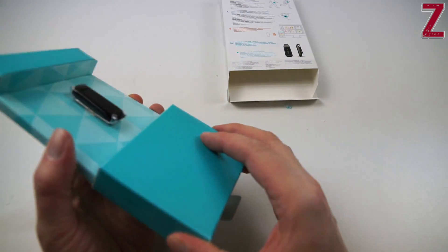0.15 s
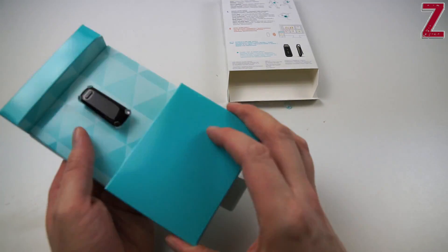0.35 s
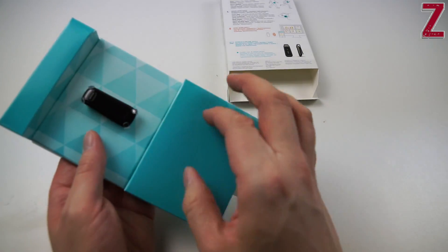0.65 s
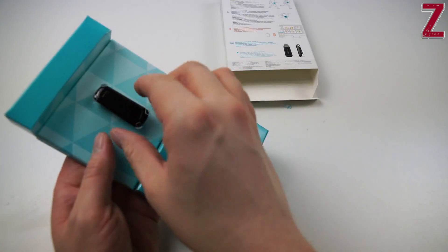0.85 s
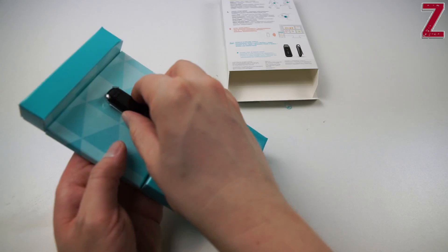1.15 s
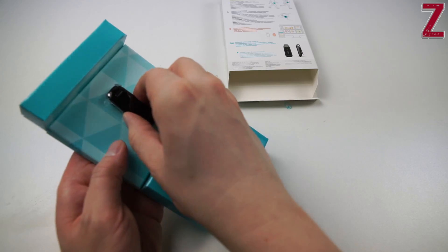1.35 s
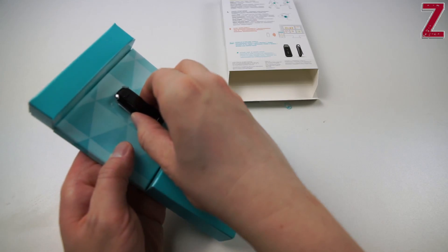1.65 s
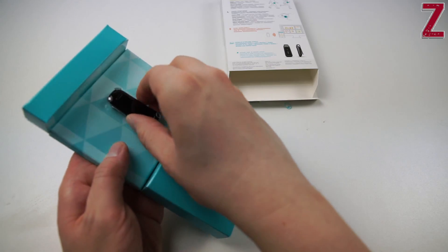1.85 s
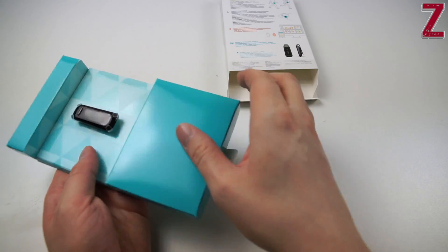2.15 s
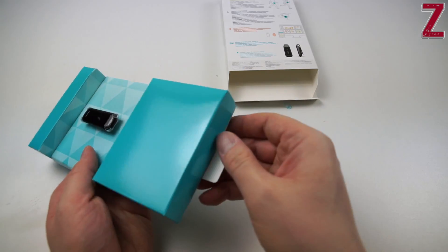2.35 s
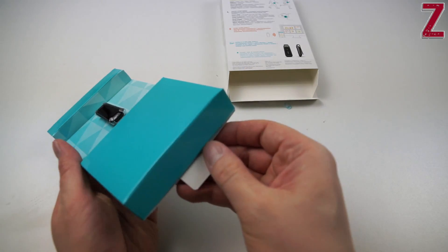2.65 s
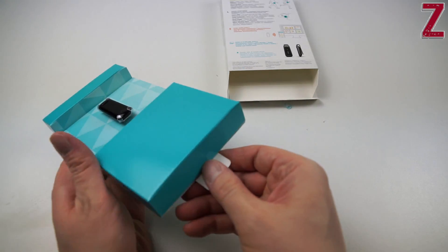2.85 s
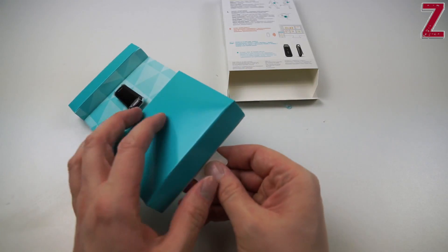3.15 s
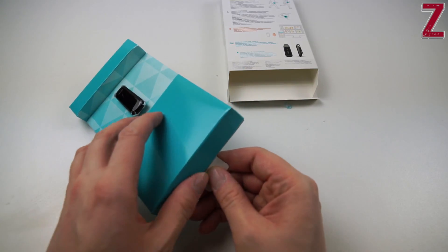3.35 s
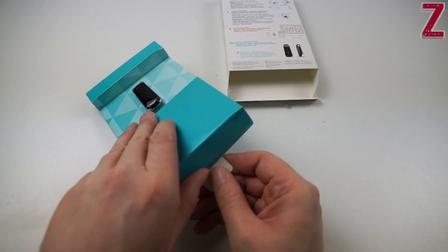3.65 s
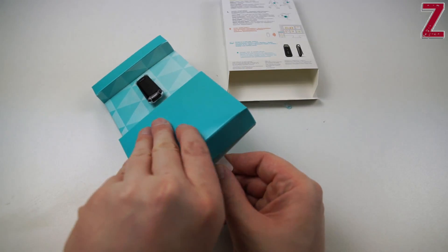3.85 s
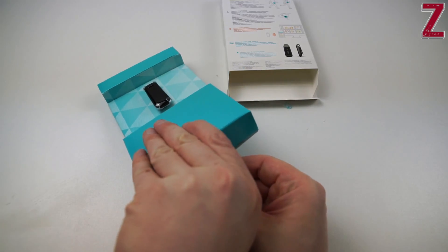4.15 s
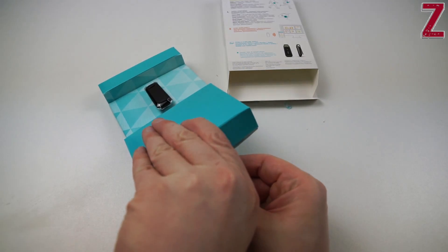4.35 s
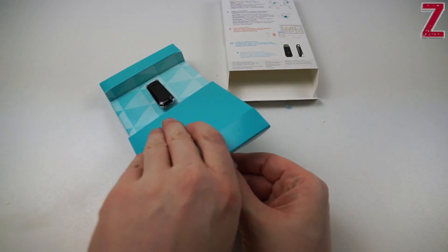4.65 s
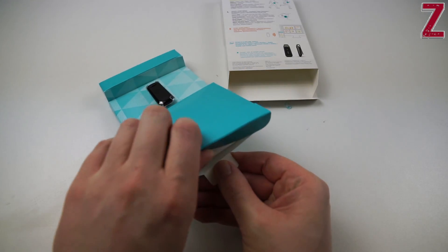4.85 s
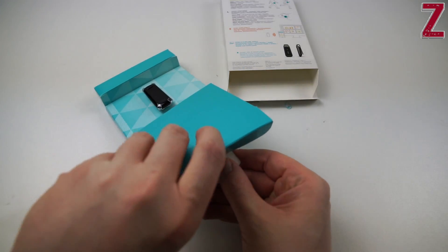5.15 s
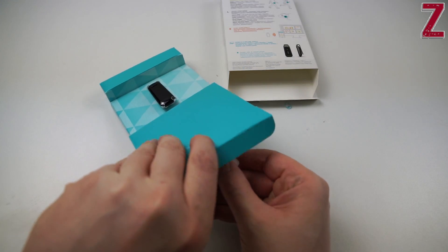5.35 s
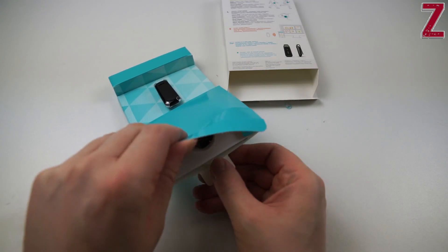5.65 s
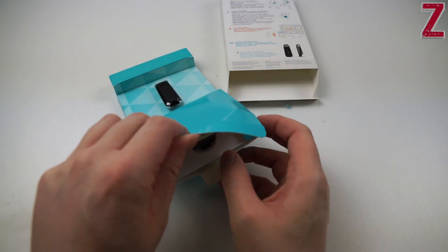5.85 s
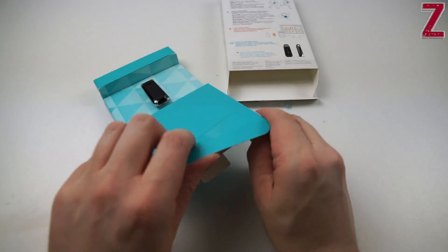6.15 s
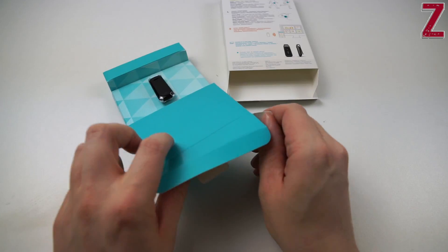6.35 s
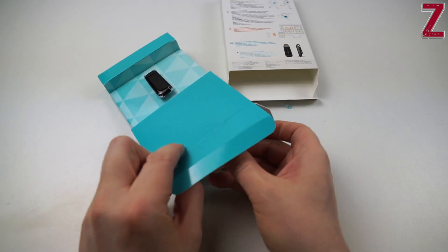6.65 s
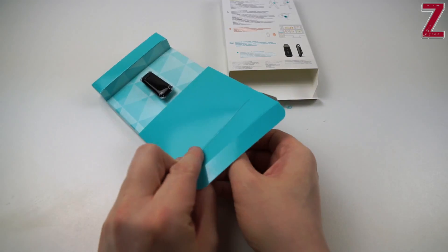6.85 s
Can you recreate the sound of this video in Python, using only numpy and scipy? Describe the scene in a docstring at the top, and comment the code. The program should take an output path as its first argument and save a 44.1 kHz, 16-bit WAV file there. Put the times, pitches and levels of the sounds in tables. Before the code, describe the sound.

Close in a small, quiet room, hands handle a stiff, hollow cardboard tray. Soft rubbing and scattered faint ticks come first, then a single clear hollow knock. Scraping grows, with a tiny skin squeak, until a flap tears free in a rapid burst of loud, bright snaps. Another moderate click follows, then gritty rustling and small taps to the end.

```python
"""Card rubs, scuffs, ticks and snaps, brightly hollow, as hands open a folded cardboard tray over a table.
One microphone in a small room; direct sound and short echoes tell the distance of hands and card.
Noise bursts ring the tray's modes for ticks and snaps; gritty stick-slip noise makes the rubbing and a squeak.
Leaning wrists thump the table, a wavering low tone; shaped noise gives room rumble and microphone hiss."""
import sys
import numpy as np
from scipy import signal
from scipy.fft import rfft, irfft, next_fast_len
from scipy.io import wavfile
from scipy.ndimage import map_coordinates

SR = 44100
rng = np.random.default_rng(int(sys.argv[2]) if len(sys.argv) > 2 else 0)


def amplitude_ratio(level_db):
    """Convert a level in decibels to the matching linear amplitude (field) ratio."""
    exponent = np.asarray(level_db, float) / 20
    return 10 ** exponent


def bounce(signal):
    """Save signal as a 16-bit WAV file at the path given by the first command-line argument."""
    frames = np.transpose(np.atleast_2d(signal))
    limited = np.clip(frames, -1, 1)
    pcm = np.round(limited * 32767).astype(np.int16)
    wavfile.write(sys.argv[1], SR, pcm)


N = 308259  # samples, about 7 s
SPAN = 1 << 14  # samples in one echo tail or one snap


def unit(x):
    """Scale to rms 1."""
    return x / np.sqrt(np.mean(x ** 2) + 1e-20)


def along(points, hz):
    """Read (Hz, value) points on a log frequency axis."""
    f, v = np.transpose(points)
    return np.interp(np.log(hz + 1), np.log(f + 1), v)


def curves(rows):
    """One value per sample for each column after the time."""
    s, *cols = np.transpose(rows)
    return [np.interp(np.arange(N) / SR, s, c) for c in cols]


def wobble(rate):
    """A smooth random curve with rate knots a second."""
    knots = rng.standard_normal(int(N * rate / SR) + 4)
    return map_coordinates(knots, [np.arange(N) * rate / SR])


def filtered(x, response):
    """x through a complex response of frequency."""
    m = next_fast_len(len(x) + SR // 2)
    spectrum = rfft(x, m) * response(np.fft.rfftfreq(m, 1 / SR))
    return irfft(spectrum, m)[:len(x)]


def swell(middle, half):
    """Gain that rises to 1 and falls again, 20 dB down at half a length from the middle."""
    offset = (np.arange(N) / SR - middle) / half
    return amplitude_ratio(-20 * np.minimum(offset ** 2, 9))


# how long the small room holds each pitch: pitch_hz [Hz], t60_s [s]
ROOM_DECAY = [(150, 0.068), (400, 0.27), (1000, 0.29), (2800, 0.28), (7300, 0.21), (14000, 0.21)]


def room(x, wet_db):
    """Direct sound plus a fresh noise tail whose frequencies each die at their own speed."""
    hz, t, z = signal.stft(rng.standard_normal(SPAN), SR, nperseg=256)
    decay = amplitude_ratio(-60 * t / along(ROOM_DECAY, hz)[:, None])
    tail = signal.istft(z * decay, SR, nperseg=256)[1]
    tail = np.pad(tail, (130, 0))  # echoes start 3 ms after the direct sound
    echoes = signal.fftconvolve(x, tail / np.linalg.norm(tail))[:len(x)]
    return x + amplitude_ratio(wet_db) * echoes


# modes of the hollow tray: pitch_hz [Hz], width_hz [Hz], gain_db [dB]
TRAY = [(200.4, 120, -15.5), (345, 69, -7), (483, 145, -3.5), (649.4, 34.5, 5.5), (766, 96, -5),
        (1065, 400, -0.5), (1223, 400, 5), (1450, 600, 1), (1746, 510, -3), (2103, 205, -2.5),
        (2603, 260, -8), (3136, 142, -11.5), (3770, 220, -18), (4430, 590, -19), (5570, 920, -16.5),
        (7120, 550, -16.5), (8740, 730, -19.5), (10970, 3600, -26.5)]


def tray(hz, strength_db, modes=TRAY):
    """Resonances of the hollow card, alternating in sign, each driven by its own strength."""
    response = 0
    for k, ((centre, width, db), strength) in enumerate(zip(modes, strength_db)):
        damping = 1j * hz * width
        resonance = damping / (centre * centre - hz * hz + damping)
        response = response + (-1) ** k * amplitude_ratio(db + strength) * resonance
    return response


def thin(hz):
    """A small sheet of card moves little air in the bass."""
    return (1j * hz / (170 + 1j * hz)) ** 2


# spectrum of room rumble and murmur of air: pitch_hz [Hz], level_db [relative dB per Hz]
RUMBLE_SHAPE = [(12, -58.5), (20, 21.5), (52, -5), (86, -13), (382, -24.5), (776, -22.5), (847, -23),
                (1260, -16), (1510, -25), (4000, -36.5), (5200, -70), (8800, -120)]


def hush():
    """Low room rumble and steady microphone hiss, both shaped noise."""
    rumble_db, hiss_db = -58, -73  # rms, dB
    rumble = filtered(rng.standard_normal(N),
                      lambda hz: amplitude_ratio(along(RUMBLE_SHAPE, hz)) / (1 + (31 / (hz + 1)) ** 8))
    hiss = filtered(rng.standard_normal(N),
                    lambda hz: 1 / (1 + (3000 / (hz + 1)) ** 4) / (1 + hz / 9000))
    return amplitude_ratio(rumble_db) * unit(rumble) + amplitude_ratio(hiss_db) * unit(hiss)


# weight comes onto the table top: middle_s [s], half_length_s [s], gain_db [dB]
LEANS = [(2.274, 0.23, -63.5), (2.576, .06, -65), (3.136, 0.17, -62), (3.362, 0.02, -43.5),
         (3.392, 0.054, -39), (3.514, .1, -62.5)]


def thump():
    """Wrists lean on the table: its lowest mode shudders unsteadily and rattles the tray's lowest modes."""
    table_hz = 126.3  # centre of a wandering pitch
    weights = np.array([amplitude_ratio(db) * swell(s, half) for s, half, db in LEANS])
    phase = 2 * np.pi * np.cumsum(table_hz * (1 + .1 * wobble(30))) / SR
    rattle = filtered(rng.standard_normal(N),
                      lambda hz: tray(hz, [0, 0], TRAY[:2]) / (1 + (hz / 500) ** 4))
    shudder = amplitude_ratio(0.74 * wobble(49)) * np.sin(phase)
    return weights.sum(0) * (shudder + 0.4 * unit(rattle))


def grit(share, spread_db, flutter_db, rate):
    """Stick-slip drive: smooth noise with tiny slips of uneven size, fluttering rate knots a second."""
    chance, size = rng.random(N), rng.exponential(size=N)
    sign, smooth = rng.standard_normal(N), rng.standard_normal(N)
    slips = unit((chance < .01) * sign * amplitude_ratio(spread_db * np.minimum(size, 3)))
    return unit((smooth + share * slips) * amplitude_ratio(flutter_db * wobble(rate)))


# a fingertip dragged over the glossy face: time_s [s], gain_db [dB]
SQUEAK = [(3.66, -83), (3.738, -66), (3.79, -79), (3.876, -54.5), (3.892, -43), (3.964, -58), (3.976, -65),
          (4.094, -65), (4.14, -92)]
# bands of the gloss, their response squared in use: pitch_hz [Hz], width_hz [Hz], gain_db [dB]
GLOSS = [(5500, 700, 12.5), (7080, 600, 9)]


def squeak():
    """Skin on gloss chatters: gritty noise through two high bands."""
    t = np.arange(N) / SR
    drive = grit(share=.3, spread_db=3, flutter_db=1, rate=40)
    chatter = unit(filtered(drive, lambda hz: tray(hz, [0, 0], GLOSS) ** 2))
    touching = (t > SQUEAK[0][0]) * (t < SQUEAK[-1][0])
    return touching * amplitude_ratio(curves(SQUEAK)[0]) * chatter


def held(drive, modes, grip_db):
    """The shifting grip frees one mode and damps another, while the total stays the same."""
    free = amplitude_ratio(grip_db * np.array([wobble(9) for mode in modes]))
    weight = np.array([amplitude_ratio(2 * db) * width for hz, width, db in modes])[:, None]
    free /= np.sqrt((weight * free ** 2).sum(0))
    ringing = 0
    for freedom, mode in zip(free, modes):
        ringing = ringing + freedom * filtered(drive, lambda hz: thin(hz) * tray(hz, [0], [mode]))
    return unit(ringing)


# hands never leave the card: time_s [s], gain_db [dB, before the shares below]
HOLD = [(0, -54.5), (0.6, -60.5), (0.8, -63.5), (1.2, -56.5), (1.58, -61.5), (1.8, -58.5), (2.8, -51.5),
        (3.5, -57.5), (3.75, -49), (4.3, -53), (4.8, -57.5), (5.4, -48), (5.75, -51), (6.5, -49),
        (6.99, -53.5)]
# share of the hold in pressure, scrape and slide, a row each: share_db [dB]
HOLD_SHARE = [(-7,), (-7,), (-14,)]
# a finger catches and lets go, or the card tears on just after a big snap (3.051 s, 5.234 s): start_s [s],
# fade_s [s, to 20 dB down], # pressure_db on the hollow, scrape_db of edges, slide_db of skin [dB gains]
SCUFFS = [(0.0, 0.47, -50, -72, -70), (1.034, 0.092, -53, -52.5, -68), (1.675, 0.22, -60, -43, -63),
          (1.806, 0.059, -67, -52, -62), (1.918, 0.54, -52.5, -65, -80), (2.1, 0.16, -51.5, -50, -75),
          (2.26, 0.19, -46, -51, -62), (2.513, 0.12, -46, -46, -70), (2.808, 0.19, -54.5, -58.5, -53),
          (3.54, .25, -47.5, -49.5, -74), (4.374, .12, -42.5, -31.5, -48), (4.979, 0.11, -44, -67, -54.5),
          (3.051, 0.095, -36, -41, -49.5), (5.234, 0.063, -39, -31, -46), (5.877, 0.28, -61, -48, -56.5),
          (6.016, 0.14, -50, -61, -49), (6.57, .15, -50, -44, -59), (6.668, 0.056, -46, -56, -75),
          (6.841, 0.15, -42.5, -44, -55.5)]
# a finger sweeps along, swelling and fading: middle_s [s], half_length_s [s],
# pressure_db, scrape_db, slide_db [dB gains]
SWEEPS = [(0.082, .03, -51, -59, -70), (0.168, .05, -50, -57, -64), (0.272, 0.11, -47.5, -48.5, -57),
          (0.442, 0.066, -53.5, -57, -58.5), (0.55, 0.12, -51, -58, -65), (0.692, .05, -60, -63, -76),
          (1.007, 0.06, -54, -63, -76), (1.305, 0.27, -56.5, -55.5, -75.5), (1.444, 0.053, -55, -57, -70),
          (2.47, 0.054, -54, -71, -62.5), (2.66, 0.085, -70, -57, -67), (2.984, 0.14, -49.5, -51.5, -60),
          (3.174, 0.11, -55, -56, -68), (3.36, 0.22, -50.5, -54.5, -69), (3.9, 0.19, -49, -50.5, -55.5),
          (3.937, 0.032, -40.5, -42, -57), (4.059, 0.15, -40, -43.5, -65), (4.285, 0.13, -54, -61, -83),
          (4.493, 0.072, -42, -38, -50.5), (4.898, 0.16, -50.5, -55.5, -64.5),
          (5.078, 0.066, -41.5, -52, -59), (5.2, 0.07, -55, -54, -61.5), (5.474, 0.05, -65, -69, -54.5),
          (5.65, 0.073, -50, -52, -73), (5.775, 0.067, -49, -51, -61), (6.063, 0.086, -49, -50.5, -48),
          (6.59, 0.14, -61, -72, -56), (6.246, 0.03, -43.5, -43, -48), (6.355, 0.052, -51, -49, -47.5),
          (6.784, 0.072, -50.5, -50, -57), (6.93, 0.07, -67, -48.5, -57)]


def strokes():
    """Pressure, scrape and slide gains of all finger strokes and tears over the steady hold, adding in power."""
    catch_s = 0.0028  # rise of a scuff
    t = np.arange(N) / SR
    power = amplitude_ratio(2 * (curves(HOLD)[0] + np.array(HOLD_SHARE)))
    for s, fade, *db in SCUFFS:
        since = np.maximum(t - s, 0)
        rise = np.minimum(since / catch_s, 1)
        fall = amplitude_ratio(-20 * np.minimum((since / fade), 9))
        power = power + np.outer(amplitude_ratio(np.array(db)), rise * fall) ** 2
    for s, half, *db in SWEEPS:
        power = power + np.outer(amplitude_ratio(np.array(db)), swell(s, half)) ** 2
    return np.sqrt(power)


# spectrum of skin sliding on card: pitch_hz [Hz], level_db [relative dB per Hz]
SKIN = [(1470, -9), (2500, 2), (3970, 1.5), (6550, 2), (8310, -2), (11800, -2.5), (15800, -20.5)]


def rubbing():
    """Pressing flexes the hollow, edges scrape the middle modes, skin slides with a hiss."""
    pressing, scraping, sliding = strokes()
    slide_db = 20 * np.log10(sliding)
    hollow = [m for m in TRAY if m[0] < 900]
    face = [m for m in TRAY if 900 < m[0] < 3500]

    press = held(grit(share=.9, spread_db=4, flutter_db=2, rate=35), hollow, grip_db=4)
    press = filtered(press, lambda hz: 1 / (1 + (hz / 1300) ** 4))  # soft fingertips drive no treble

    scrape = held(grit(share=1.1, spread_db=4, flutter_db=2.2, rate=55), face, grip_db=3.5)
    scrape = filtered(scrape, lambda hz: 1 / (1 + (hz / 3300) ** 4))

    drive = grit(share=.25, spread_db=2, flutter_db=1.5, rate=35)
    tray_colour = lambda hz: 1 + 0.89 * abs(tray(hz, np.zeros(len(TRAY))))
    slide = unit(filtered(drive, lambda hz: amplitude_ratio(along(SKIN, hz)) * tray_colour(hz)))
    air = filtered(slide, lambda hz: 1 / (1 + (8000 / (hz + 1)) ** 6))
    treble_db = np.clip(.5 * (slide_db + 44), -12, 3)  # a stronger slide is brighter
    slide = slide + air * (amplitude_ratio(treble_db) - 1)

    rubbed = pressing * press + scraping * scrape + sliding * slide
    return room(rubbed + squeak(), wet_db=-8.0)


# ticks, taps and snaps of the card: start_s [s], level_db [dB, before a common 1.5 dB trim],
# knock_db of the low modes and top_db of the high ones [dB peak against the middle modes],
# favoured_hz [Hz], the pitch the landing spot brings out
SNAPS = [(0.0143, -34.5, -7, -9.5, 1410), (0.185, -37.5, 5.5, -11, 460), (0.2661, -34.5, 4, -18, 430),
         (0.3267, -41, -27, -24, 1290), (0.596, -42.5, 2, -1.5, 526), (0.793, -47, -17, -17, 1150),
         (0.875, -56.5, 11, -17, 700), (0.9414, -50, 10, -19, 643), (1.037, -41, -2, -20, 947),
         (1.281, -54, -10, 6, 1500), (1.379, -48, 4, -12, 1200), (1.4471, -37, -0.5, -24, 1310),
         (1.623, -38, -13, -10, 1120), (1.679, -46.5, 0.5, -3, 1120), (1.723, -39, -5, -10, 1390),
         (1.7374, -36, -5, -15, 1440), (1.8034, -32, -7.5, -8, 1450), (1.9169, -37.5, -28, -29, 1450),
         (1.9536, -41, -8, -31, 1740), (2.009, -40, -2, -12, 1400), (2.0991, -45.5, 8.5, -3, 1140),
         (2.139, -38.5, 0, -7, 643), (2.166, -44.5, 7, 0, 427), (2.2573, -35.5, -2, -10.5, 1080),
         (2.2732, -35, -2, -16, 654), (2.3873, -37.5, -3.5, -3.5, 1410), (2.4414, -43.5, -12, 3.5, 920),
         (2.5124, -30.5, -6, -20, 1000), (2.806, -38, 0.5, -5, 958), (3.047, -12, -3.5, -23, 337),
         (3.4089, -38.5, -8, -29, 1420), (3.539, -40, -22, -4, 1230), (4.314, -40.5, -6, -12, 1360),
         (4.353, -36.5, -8, -9.5, 1370), (4.3701, -26, -28.5, -3.5, 1210), (4.5228, -10.5, -13.5, -1, 2000),
         (4.534, -21, -17, 10, 1370), (4.569, -7.5, -10.5, -12, 1960), (4.577, -5.5, -11, 5, 990),
         (4.5883, -10.5, -8.5, 0, 780), (5.059, -50, -8, 2, 1200), (5.098, -41, -7, -2, 700),
         (5.1945, -34.5, -4, -10, 1300), (5.231, -19.5, -7, 4, 810), (5.5371, -52, -12, 11, 1300),
         (5.6306, -43, -5, -5, 935), (5.6645, -44, 3, -3, 650), (5.818, -42, -5, -12, 500),
         (5.8795, -47, 15.5, -13, 650), (5.9573, -37.5, -17, -23, 1110), (6.017, -39, 4.5, -15, 660),
         (6.2484, -24, -8, -6.5, 1970), (6.356, -33, -11, -23, 1290), (6.565, -37, -7, -10, 1230),
         (6.6628, -34, 5, -8.5, 610), (6.838, -33, -8, -3.5, 900), (6.8734, -37, 1, -14, 654)]


def snaps():
    """A short noisy contact drives the tray's low, middle and high modes, each group at its own level."""
    out, t = np.zeros(N + SPAN), np.arange(SPAN) / SR
    modes_hz = np.array(TRAY)[:, 0]
    group = np.digitize(modes_hz, [900, 2900])  # 0 low, 1 middle, 2 high
    for s, db, knock_db, top_db, favoured_hz in SNAPS:
        contact_s = 0.0038 * amplitude_ratio(0.27 * (db + 11.5))  # a harder snap tears for longer
        burst = .3 * rng.standard_normal(SPAN) * np.exp(-t / contact_s)
        burst[:3] += [.5, 1, .5]  # the first click
        luck_db = rng.normal(0, 1.5, len(TRAY))
        nearness = np.exp(-(np.log(modes_hz / favoured_hz) / 0.2) ** 2)
        strength_db = luck_db + 8 * (group < 2) * nearness
        ring = 0
        for k, (level_db, soft_hz) in enumerate([(knock_db, 1100), (0, 3200), (top_db, 17000)]):
            # card yields: each group fades above its range
            soft = lambda hz: thin(hz) / (1 + 1j * hz / soft_hz) ** 3
            driven_db = np.where(group == k, strength_db, -99)
            part = filtered(burst, lambda hz: soft(hz) * tray(hz, driven_db))
            ring = ring + amplitude_ratio(level_db) * part / np.abs(part).max()
        out[round(s * SR):][:SPAN] += amplitude_ratio(db - 1.5) * room(ring, wet_db=-2.5)
    return out[:N]


def scene():
    """All sources at one microphone."""
    return (hush() + thump() + rubbing() + snaps())[None]


def low_pass(x):
    """Removes everything above the highest recorded frequency."""
    return signal.sosfilt(signal.butter(12, 15900, fs=SR, output="sos"), x)


def record(dry):
    """The finished mix, as it is kept."""
    return low_pass(dry)


dry = scene()
out = record(dry)
bounce(out)
```